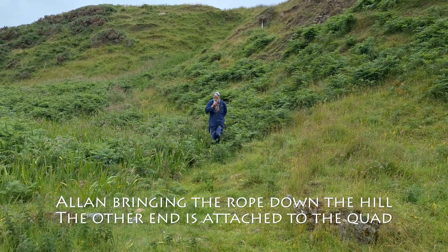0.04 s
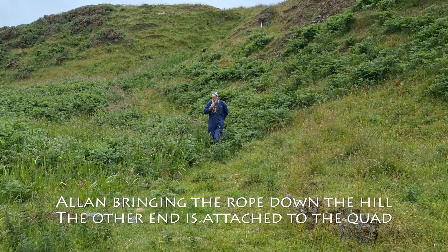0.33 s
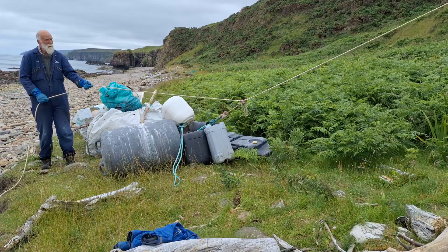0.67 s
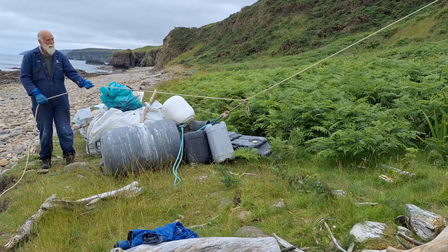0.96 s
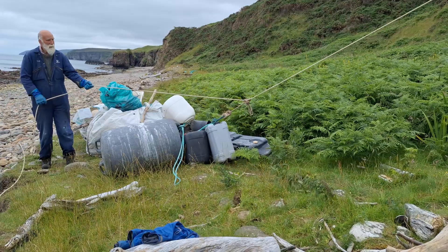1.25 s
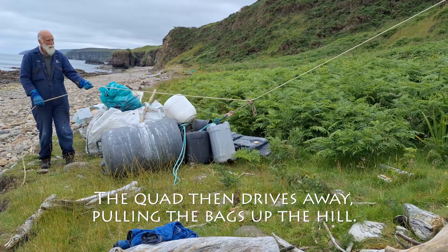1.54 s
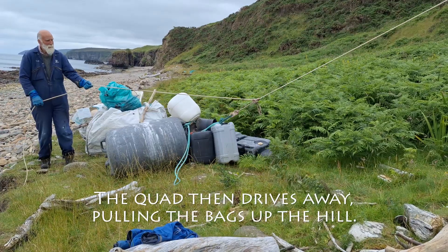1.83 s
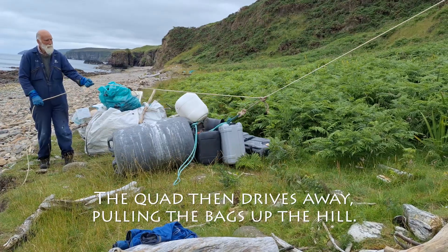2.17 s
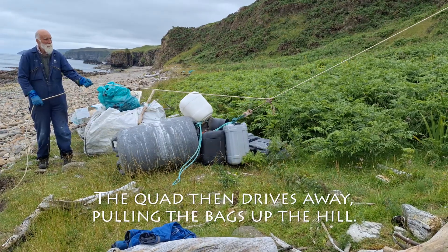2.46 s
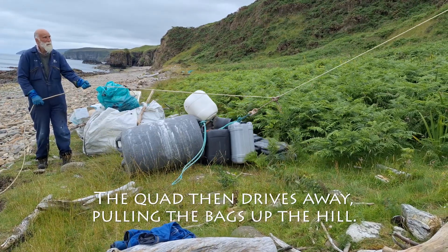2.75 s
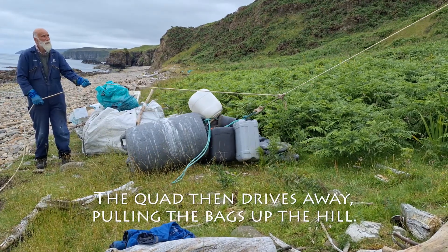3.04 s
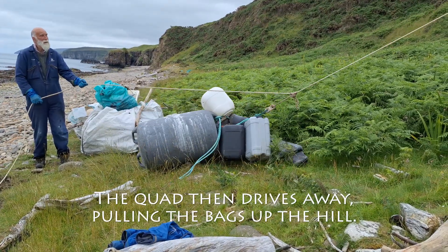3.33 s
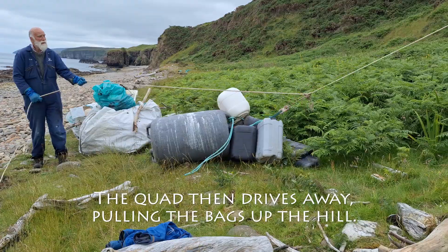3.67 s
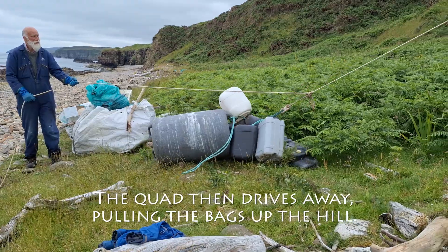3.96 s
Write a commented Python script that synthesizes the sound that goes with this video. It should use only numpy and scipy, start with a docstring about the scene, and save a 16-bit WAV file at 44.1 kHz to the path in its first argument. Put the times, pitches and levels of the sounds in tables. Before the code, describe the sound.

A load of bags and hollow plastic containers scrapes across grass outdoors. Wind rumbles on the microphone over distant surf, a few cracks and knocks sound as a far engine starts pulling, and the barrel rumbles and groans near the end.

```python
"""A quiet hillside: soft air, swishing grass, a far bird and one faint snap. Half a second in, a short
silence, then a shore where wind buffets the microphone over distant surf. A rope takes the strain on
bags, cans and a plastic barrel, which rustle, crack and knock, and the towing engine's hum comes in.
The load slides over grass: stems hiss and crackle, hollow plastic scrapes and rumbles, and near the
end the barrel lurches and groans."""
import sys
import numpy as np
from scipy import signal
from scipy.fft import rfft, irfft
from scipy.io import wavfile

SR = 44100
rng = np.random.default_rng(int(sys.argv[2]) if len(sys.argv) > 2 else 0)


def generate_wav(signal):
    """Clip the signal to [-1, 1] and save it as 16-bit WAV at the path in sys.argv[1]."""
    frames = np.transpose(np.atleast_2d(signal))
    scaled = np.clip(frames, -1, 1) * 32767
    pcm = np.round(scaled).astype(np.int16)
    wavfile.write(sys.argv[1], SR, pcm)


N = 176400
T = np.arange(N) / SR
HZ = np.maximum(np.arange(N // 2 + 1) * SR / N, 1)


def amp(db):
    """Decibels to gain."""
    return 10 ** (np.asarray(db) / 20)


def unit(x):
    """Scale to an rms of one."""
    return x / np.sqrt(np.mean(x ** 2))


def noise():
    """Two unrelated white noises."""
    return rng.standard_normal((2, N))


def curve(rows, column=1):
    """An automation curve from one column of a table."""
    rows = np.array(rows)
    return np.interp(T, rows[:, 0], rows[:, column])


def over_pitch(rows):
    """Points joined on a log-frequency axis."""
    rows = np.array(rows)
    return np.interp(np.log(HZ), np.log(rows[:, 0]), rows[:, 1])


def shape(x, response):
    """Filter by a frequency response."""
    return irfft(rfft(x) * response, N)


def colour(x, rows):
    """Apply an EQ curve and return to unit level."""
    return unit(shape(x, amp(over_pitch(rows))))


def lowpass(hz):
    """A response that falls 24 dB per octave above hz."""
    return 1 / (1 + (HZ / hz) ** 4)


def band(hz, octaves):
    """A bell-shaped response on a log-frequency axis."""
    return np.exp(-(np.log2(HZ / hz) / octaves) ** 2 / 2)


def body(modes):
    """Response of a hollow body: a sum of resonances."""
    return sum((-1) ** k * amp(db) / (1 + 1j * (HZ ** 2 - hz ** 2) / (HZ * width))
               for k, (hz, width, db) in enumerate(modes))


def pan(db):
    """Stereo gains for a level difference; positive leans left."""
    gains = amp(np.array([[1], [-1]]) * db / 2)
    return gains / np.sqrt(np.mean(gains ** 2, axis=0))


def pair(x, likeness):
    """Blend two unrelated signals into stereo: likeness 0 is wide, 1 is mono."""
    mid = shape(x[0], np.sqrt((1 + likeness) / 2))
    side = shape(x[1], np.sqrt((1 - likeness) / 2))
    return mid + np.array([[1], [-1]]) * side


def drift(rate_hz):
    """Smooth random modulation with a spread of one."""
    return unit(shape(rng.standard_normal(N), lowpass(rate_hz)))


def grains(per_s, spread_db):
    """Random tiny contacts of uneven strength."""
    clicks = noise() * (rng.random(N) < per_s / SR)
    return unit(clicks * amp(spread_db * np.minimum(rng.exponential(size=N), 6)))


def swells(rows):
    """Bell-shaped swells of level."""
    return sum(amp(db) * np.exp(-((T - s) / half) ** 2 / 2) for s, half, db, *_ in rows)


def impact(start, push_db, grit_db, t60, tail_db, tail_t60):
    """A contact: one clean push, then grit that dies fast and leaves a faint tail."""
    age = np.maximum(T - start, 0)
    decay = amp(-60 * age / t60) + amp(tail_db - 60 * age / tail_t60)
    push = np.outer([1, 0], np.arange(N) == round(start * SR))
    return amp(push_db) * push + amp(grit_db) * noise() * (T >= start) * decay


def struck(contact, response):
    """Ring a body through its response, scaled to unit power."""
    return shape(contact, response / np.sqrt(np.mean(abs(response) ** 2)))


# Tone of the hillside air. Each row: frequency in Hz, relative level in dB.
AIR_EQ = [(130, -18), (320, 4), (560, -9), (1000, -8.5), (1550, -3), (2400, -6.5), (2950, -20.5),
          (4800, -16.5), (6000, -26.5), (8000, -13.5), (12000, -28), (15500, -20)]
def hill_air():
    """A soft, wide bed of open air."""
    return amp(-66.5) * colour(pair(noise(), likeness=0.12), AIR_EQ)


# Tone of the long grass. Each row: frequency in Hz, relative level in dB.
SWISH_EQ = [(2800, -28), (4800, -2), (6000, -11), (7900, 3), (10000, 0), (12200, -9), (15500, -6)]
# Swishes. Each row: peak time in seconds, half length in seconds, level in dB.
SWISHES = [(.07, 0.052, -72.5), (.28, 0.025, -68.5), (.35, 0.033, -66.5)]
def long_grass():
    """Long grass swishes in brief, airy swells."""
    return swells(SWISHES) * colour(noise(), SWISH_EQ)


# Bird notes. Each row: start in seconds, length in seconds, base pitch in Hz, level in dB.
BIRD_NOTES = [(0.043, 0.054, 3130, -76.5), (.07, .17, 2480, -75.5), (0.245, 0.046, 2490, -63.5),
              (0.346, 0.039, 2440, -60.5), (0.449, 0.056, 2480, -64.5)]
def bird():
    """Thin, far whistles, each arching up and down in pitch and level."""
    out = 0
    for start, length, pitch, db in BIRD_NOTES:
        arch = np.sin(np.pi * np.clip((T - start) / length, 0, 1))
        hz = pitch + 68.6 * arch + 40 * drift(100)
        out = out + amp(db) * arch * np.sin(2 * np.pi * np.cumsum(hz) / SR)
    return out * pan(12)


# Tone of wind on the microphone, hill and shore. Each row: frequency in Hz, relative level in dB.
WIND_EQ = [(20, -70), (35, -6), (52, -1), (72, 2.5), (92, -3.5), (120, -13), (170, -23.5), (250, -33),
           (400, -84)]
# Hillside gusts. Each row: peak time in seconds, half length in seconds, level in dB.
HILL_GUSTS = [(.237, 0.014, -51), (.345, 0.0083, -45), (.43, 0.058, -47)]
def hill_breeze():
    """Light wind rumbles on the microphone, hard right."""
    return (amp(-63.5) + swells(HILL_GUSTS)) * colour(noise(), WIND_EQ) * pan(-37)


# Fader ride of the shore wind. Each row: time in seconds, level in dB.
WIND_LEVEL = [(.548, -39), (.58, -31), (.68, -30), (1.05, -31.5), (1.15, -37), (1.6, -41), (1.9, -34.5),
              (2.1, -44), (2.4, -34.5), (2.58, -46), (2.8, -35), (3.2, -42), (3.4, -36.5), (3.75, -35.5),
              (4, -43.5)]
# Buffets. Each row: peak time in seconds, half length in seconds, level in dB.
BUFFETS = [(.69, 0.016, -25), (.788, 0.0066, -24), (.876, 0.011, -17.5), (1.24, 0.024, -26.5),
           (1.885, 0.0052, -24.5)]
# Tone of a buffet. Each row: frequency in Hz, relative level in dB.
BUFFET_EQ = [(25, -8), (50, 1.5), (80, 13), (130, -6.5), (210, -16.5), (480, -83)]
def shore_wind():
    """Eddies rumble at the microphone ports, with a few hard buffets and no treble."""
    eddies = amp(curve(WIND_LEVEL)) * colour(pair(noise(), likeness=0.22), WIND_EQ)
    buffets = swells(BUFFETS) * colour(pair(noise(), likeness=0.22), BUFFET_EQ)
    return shape(eddies + buffets, lowpass(700)) * pan(2)


# Tone of surf on stones. Each row: frequency in Hz, relative level in dB.
SURF_EQ = [(150, 20.5), (330, 11.5), (520, 3), (800, 5), (1200, 0), (1800, 1.5), (2800, -12.5), (4500, -17),
           (7000, -12), (10000, -17.5), (15500, -26)]
def surf():
    """The distant wash of the sea, wavering in level."""
    return amp(-56 + 2.3 * drift(11.5)) * colour(pair(noise(), likeness=0.36), SURF_EQ) * pan(3)


def engine(firing_hz=90.7, pull_s=1, rise_s=0.5):
    """The far towing engine fades in as it takes the load; only its low hum carries."""
    phase = 2 * np.pi * np.cumsum(firing_hz * (1 + 0.01 * drift(8.9))) / SR
    effort = np.clip((T - pull_s) / rise_s, 0, 1)
    return amp(-46 + 0.56 * drift(1.1)) * effort * unit(np.sin(phase))


# Bag rustles. Each row: peak time in seconds, half length in seconds, level in dB, centre in Hz.
RUSTLES = [(.740, 0.0075, -56, 2000), (.755, 0.028, -69.5, 4530), (0.897, 0.0066, -64, 6800),
           (1.068, 0.007, -67, 9100), (1.95, 0.039, -59.5, 5700)]
def bag_rustles():
    """The woven bags crinkle softly as they shift."""
    out = 0
    for peak, half, db, hz in RUSTLES:
        crinkle = unit(shape(grains(per_s=2200, spread_db=1.7), band(hz, octaves=0.5)))
        out = out + crinkle * swells([(peak, half, db)])
    return out * pan(7.1)


# Resonances of stiff plastic. Each row: frequency in Hz, width in Hz, relative level in dB.
PLASTIC_MODES = [(990, 280, 15.5), (1420, 620, 11.5), (2670, 204, 7.5), (3460, 410, 4), (5700, 730, 2.5),
                 (7430, 610, 0), (9720, 370, 0.5), (12200, 2900, -11.5)]
# Cracks. Each row: start in seconds, level in dB, centre in Hz, pan to the left in dB.
CRACKS = [(0.338, -52.5, 1900, 5), (0.8328, -27.5, 3270, 9), (1.511, -50.5, 3820, 11),
          (1.651, -35, 3550, 18), (1.693, -43, 14000, 3), (1.921, -43, 5600, 8), (1.961, -35.5, 5360, 7),
          (2.661, -43.5, 1800, 19), (3.037, -39.5, 1810, 13)]
def cracks():
    """Dry snaps of sticks and stiff plastic, most as the load takes the strain."""
    out = 0
    plastic = body(PLASTIC_MODES) * HZ / (HZ + 400)
    for start, db, hz, pan_db in CRACKS:
        contact = impact(start, push_db=13.5, grit_db=-3.5, t60=0.008, tail_db=-13.5, tail_t60=0.1)
        snap = struck(pair(contact, likeness=0), plastic * band(hz, octaves=1.15))
        out = out + amp(db) * pan(pan_db) * snap
    return out


# Stereo image of the load. Each row: frequency in Hz, likeness of the channels from 0 to 1.
LOAD_LIKENESS = [(250, 1), (1000, 0.91), (2500, 0.7), (6000, 0.3), (15000, 0.25)]
def from_load(x, left_lead_ms=0.082):
    """Place a sound at the load: narrow lows, wide highs, reaching the left side first."""
    lag_s = np.array([[0], [left_lead_ms]]) / 1000
    return shape(pair(x, over_pitch(LOAD_LIKENESS)), np.exp(-2j * np.pi * HZ * lag_s))


# Resonances of a can. Each row: frequency in Hz, width in Hz, relative level in dB.
CAN_MODES = [(540, 670, -2.5), (747, 55, 11), (925, 53, 1), (1344, 230, 3), (1600, 95, 8),
             (1980, 250, -4.5), (2940, 650, -9)]
# Knocks. Each row: start in seconds, level in dB, brightness in dB per octave.
KNOCKS = [(0.894, -50, -1), (0.914, -49, -2), (1.617, -43, -15), (1.7065, -35.5, -2.5), (1.7146, -40, 4),
          (1.885, -50, 2), (1.926, -44.5, -1.5), (2.268, -43.5, -5.5), (2.709, -42, -7.5)]
def can_knocks():
    """Cans jostle; each rough contact rings their walls briefly, some dull, some bright."""
    out, can = 0, body(CAN_MODES)
    octaves = np.log2(np.maximum(HZ, 300) / 1000)
    for start, db, tilt_db in KNOCKS:
        contact = impact(start, push_db=20.5, grit_db=-2.5, t60=0.019, tail_db=-6.5, tail_t60=0.088)
        out = out + amp(db) * struck(contact, can * amp(tilt_db * octaves))
    return from_load(out) * pan(2.8)


# Tone of the grass hiss. Each row: frequency in Hz, relative level in dB.
HISS_EQ = [(1500, -10.5), (2450, -4), (2850, -7), (3400, -7), (4000, -4), (5500, -1), (7800, -3),
           (8800, -6.5), (10500, -5.5), (12500, -2), (14000, -6), (15500, -0.5)]
# Lean of the hiss. Each row: frequency in Hz, pan to the left in dB.
HISS_PAN = [(2700, 0.5), (3600, 12.5), (4500, 1), (7000, 3), (8600, -10.5), (11300, -10), (13500, -9),
            (15500, 6)]
# Fader rides of the slide. Each row: time in seconds, grass hiss in dB, plastic scrape in dB.
SLIDE_LEVELS = [(.95, -80.5, -95), (1.2, -67.5, -88), (1.42, -64, -65), (1.55, -58.5, -59.5),
                (1.68, -52.5, -51.5), (1.8, -54.5, -56.5), (1.92, -53.5, -48), (2.05, -52, -54.5),
                (2.27, -51, -51.5), (2.54, -55.5, -56), (2.7, -50.5, -51.5), (2.81, -51.5, -56.5),
                (2.92, -52.5, -56.5), (3.2, -49.5, -51.5), (3.35, -44.5, -46), (3.45, -43, -45),
                (3.62, -44.5, -46), (3.8, -47, -47.5), (4, -48, -51)]
def grass_hiss(stem_share=0.4, treble_db_per_db=0.63):
    """Stems brush and snap under the bags, brighter as the load slides harder."""
    db = curve(SLIDE_LEVELS)
    snaps = np.sqrt(stem_share) * grains(per_s=3000, spread_db=-2)
    brush = np.sqrt(1 - stem_share) * noise()
    hiss = colour(from_load(snaps + brush), HISS_EQ)
    hiss = unit(shape(hiss, pan(over_pitch(HISS_PAN))))
    treble = shape(hiss, HZ ** 2 / (HZ ** 2 + 9000 ** 2))
    hiss = hiss + treble * (amp(treble_db_per_db * (db + 45)) - 1)  # high shelf, flat at -45 dB
    return hiss * amp(db + drift(11.4))


# Tone of scraping hollow plastic. Each row: frequency in Hz, relative level in dB.
SCRAPE_EQ = [(200, 7), (390, -1.5), (560, -4), (640, 2.5), (770, 2), (900, -4), (1280, -4), (1490, -1),
             (1700, -3.5), (2500, -8), (2850, -28)]
def plastic_scrape(flicker_db=1.44):
    """Plastic sticks and slips on the ground."""
    slips = grains(per_s=900, spread_db=1.5) + 1.42 * noise()
    db = curve(SLIDE_LEVELS, column=2) + flicker_db * drift(8.1)
    return colour(from_load(slips), SCRAPE_EQ) * amp(db)


# Lurches. Each row: peak time in seconds, half length in seconds, level in dB.
LURCHES = [(2.78, 0.063, -54.5), (3.36, 0.015, -50.5)]
def barrel_lurches():
    """The barrel digs into the turf and grinds low and rough."""
    grit = from_load(grains(per_s=500, spread_db=1.4))
    return unit(shape(grit, band(420, octaves=0.94))) * swells(LURCHES)


# Groans. Each row: peak time in seconds, half length in seconds, level in dB, pitch in Hz.
GROANS = [(3.41, 0.07, -40.5, 168.9), (3.75, 0.04, -37, 190.5), (3.88, 0.061, -41, 197.1)]
def barrel_groans(waver=0.01, db_per_octave=-23):
    """Stick and slip lock onto one wall resonance and turn into a low note."""
    hz = curve(GROANS, column=3) * (1 + waver * drift(29))
    phase = 2 * np.pi * np.cumsum(hz) / SR
    note = sum(amp(db_per_octave * np.log2(k)) * np.sin(k * phase) for k in range(1, 5))
    return unit(note) * swells(GROANS)


# Resonances of the barrel. Each row: frequency in Hz, width in Hz, relative level in dB.
BARREL_MODES = [(46.3, 10, -0.5), (133, 34, -1), (153.3, 20.4, 2), (190.2, 20.5, -1.5), (213.2, 18, -3.5),
                (260.3, 21.8, -7.5), (396.6, 16, -21), (652, 72, -20)]
# Fader ride of the rumble. Each row: time in seconds, level in dB.
RUMBLE_LEVEL = [(1.35, -62), (1.55, -45.5), (1.9, -54.5), (2.1, -49), (2.3, -48), (2.55, -54), (2.68, -51),
                (2.82, -38), (3.0, -43.5), (3.15, -46.5), (3.32, -39), (3.38, -35), (3.5, -44.5),
                (3.61, -33.5), (3.68, -43), (3.75, -36.5), (3.9, -41), (4, -47.5)]
def barrel_rumble():
    """Soft bumps in the turf drum on the hollow barrel."""
    bumps = from_load(grains(per_s=500, spread_db=1.5))
    return unit(shape(bumps, body(BARREL_MODES) * lowpass(900))) * amp(curve(RUMBLE_LEVEL))


def scene(hill_ends_s=0.510, shore_starts_s=0.548):
    """The hillside, a moment of silence, then a hard cut to the shore; cracks sound in both."""
    shore = shore_wind() + surf() + engine() + grass_hiss() + bag_rustles() + plastic_scrape()
    shore += barrel_rumble() + barrel_lurches() + barrel_groans() + can_knocks()
    hillside = hill_air() + long_grass() + hill_breeze() + bird()
    return hillside * (T < hill_ends_s) + shore * (T >= shore_starts_s) + cracks()


def record(dry):
    """A steep high cut at 15.7 kHz."""
    return signal.sosfilt(signal.ellip(14, .2, 80, 15700, fs=SR, output="sos"), dry)


dry = scene()
out = record(dry)
generate_wav(out)
```